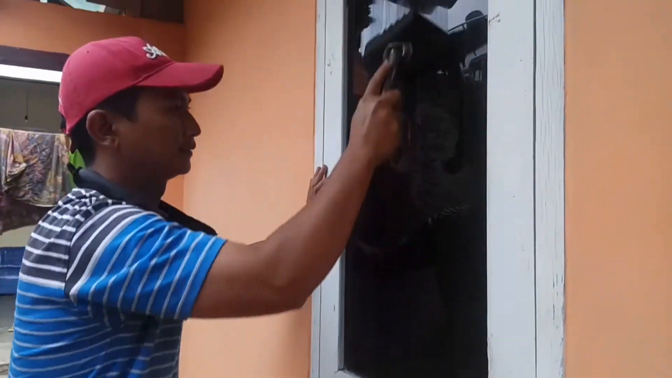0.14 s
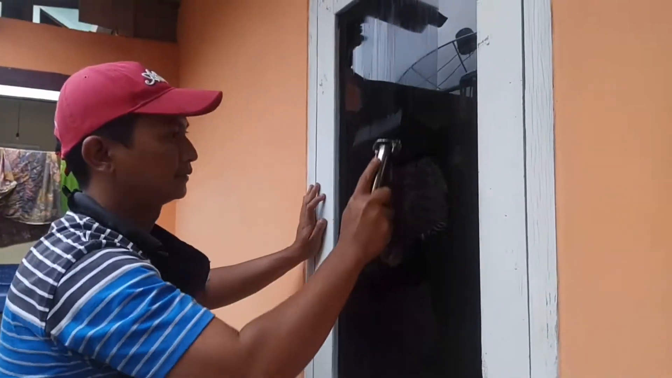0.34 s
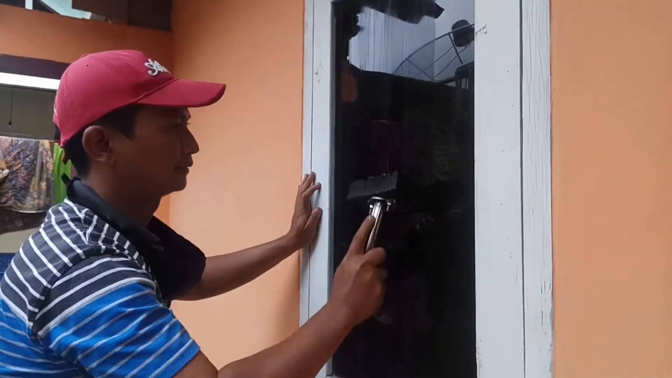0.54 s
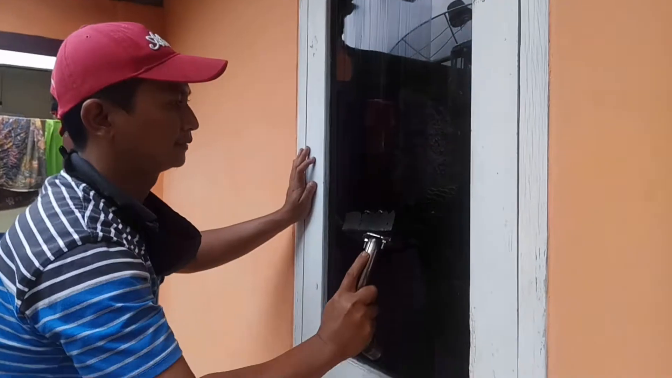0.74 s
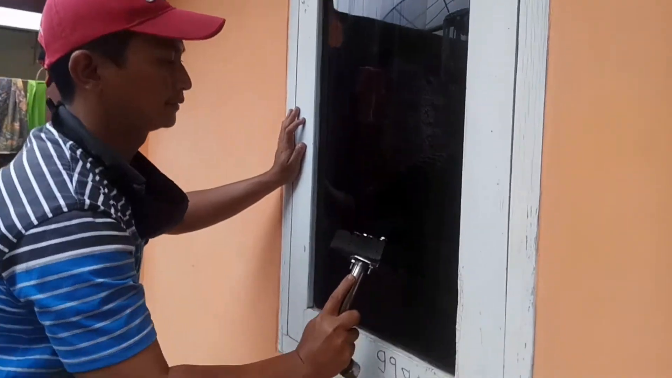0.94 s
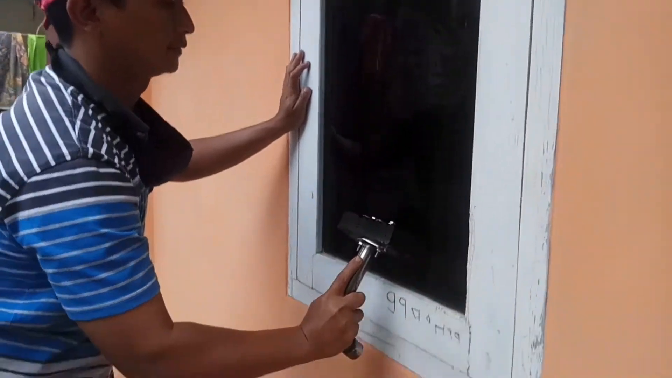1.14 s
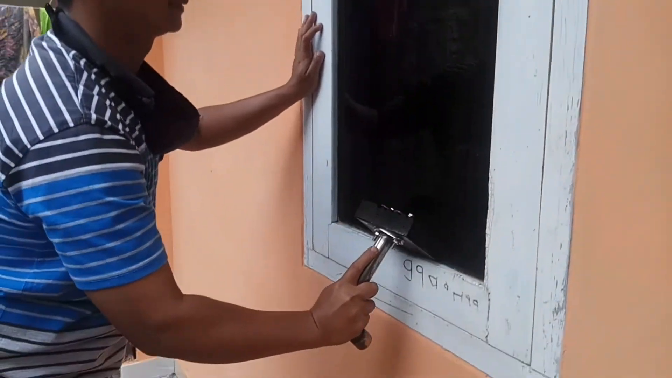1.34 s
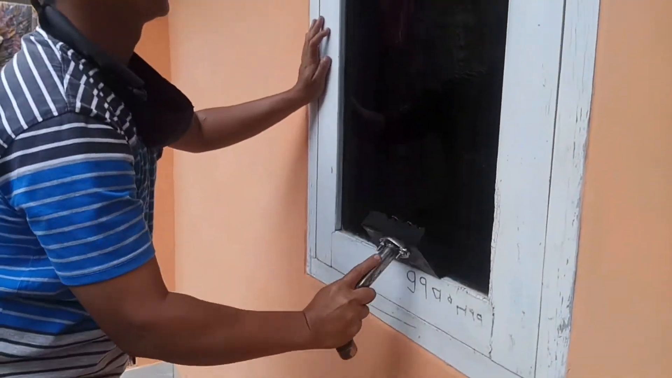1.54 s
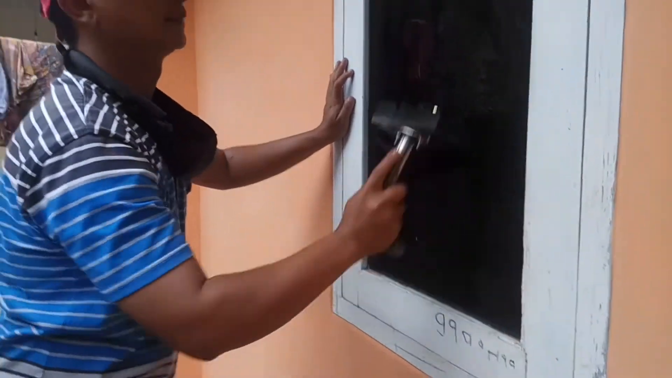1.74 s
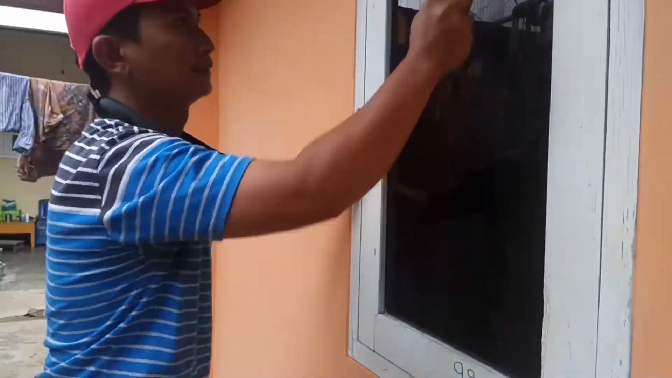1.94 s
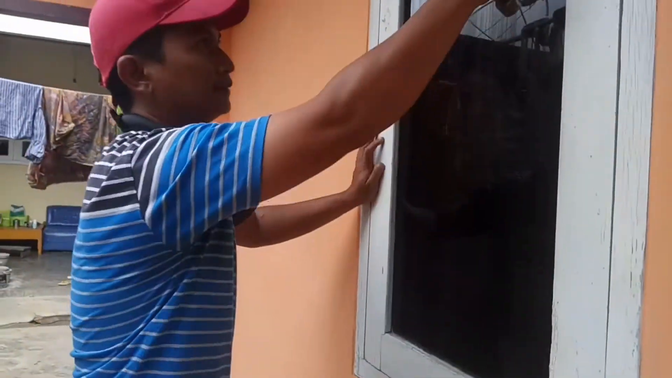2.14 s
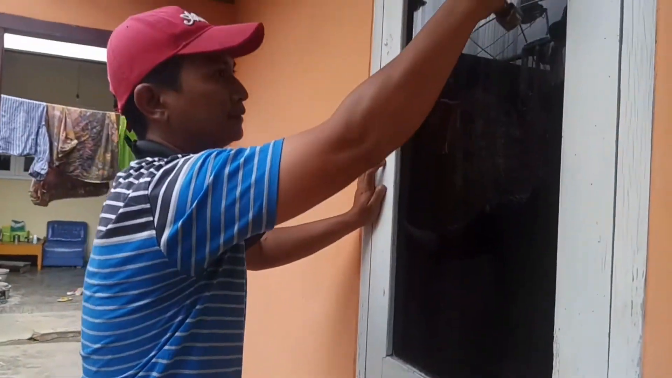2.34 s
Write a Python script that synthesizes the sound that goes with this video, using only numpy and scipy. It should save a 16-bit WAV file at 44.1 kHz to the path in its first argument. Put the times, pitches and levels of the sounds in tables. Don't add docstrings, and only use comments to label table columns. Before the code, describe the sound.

A rubber wiper grips a window pane with soft knocks and squeals one steady mid-pitched note for about a second, then thuds on the frame, lifts, and taps down again; close microphone, faint street rumble behind.

```python
import sys
import numpy as np
from scipy import signal
from scipy.io import wavfile
from scipy.ndimage import uniform_filter1d

SR = 44100
rng = np.random.default_rng(int(sys.argv[2]) if len(sys.argv) > 2 else 0)


def gain_from_db(level_db):
    decades = np.asarray(level_db, float) / 20
    return 10 ** decades


def wav_record(signal):
    frames = np.transpose(np.atleast_2d(signal))
    bounded = np.clip(frames, -1, 1)
    quanta = np.round(bounded * 32767).astype(np.int16)
    wavfile.write(sys.argv[1], SR, quanta)


N = 105840

# f/Hz, level/dB per Hz
RUMBLE_SPECTRUM = [(15, -51), (25, -34), (94, -4), (204, -23), (306, -24.5), (600, -41.5), (1310, -66),
                   (5030, -68), (6240, -65.5), (15600, -77.5)]
# f/Hz, likeness/0..1
STREET_LIKENESS = [(60, 1), (240, 0.79), (950, 0.97), (3770, 0.04), (15000, 0.03)]
# f/Hz, width/Hz, level/dB, left-right/dB
INSECT_BANDS = [
    (6400, 1100, -69, -16),
    (10800, 900, -84, -14),
    (13500, 120, -86, -12),
]
# t/s, level/dB, f/Hz, length/s, rattle/dB
BUMPS = [
    (0.0, -32, 104.7, 0.035, -21.5),
    (.165, -33, 95, .04, -24.5),
    (0.211, -34.5, 108.5, 0.04, -28.5),
    (0.417, -54, 200.3, .1, 2),
    (0.599, -56.5, 197.2, 0.095, 2),
    (1.415, -30, 78.4, 0.064, -18.5),
    (1.48, -33, 131, 0.08, -9.5),
    (1.559, -33.5, 132.7, 0.057, -16),
    (1.622, -39.5, 95.3, 0.051, -25),
    (2.19, -35.5, 140, 0.02, -17),
]
# t/s, length/s, f/Hz, width/Hz, level/dB
MURMURS = [
    (0.0, 0.047, 769, 23, -46),
    (0.043, 0.073, 771, 27, -49.5),
    (0.103, 0.11, 773, 42, -48),
    (0.0, 0.12, 332, 240, -44.5),
    (1.334, 0.078, 764, 24.8, -44),
    (2.21, 0.098, 1410, 277.8, -54.5),
]
# t/s, pressure level/dB, dullness/dB
RUB_STROKE = [(0, -50, -3.5), (.21, -49, -8), (.33, -53.5, 0), (.55, -56, 3.5), (.82, -55.5, -4),
              (.92, -48, -7.5), (1.14, -55.5, -5), (1.29, -49, 4.5), (1.44, -68.5, 16.5), (1.51, -52, 3),
              (1.59, -70, 13), (1.8, -75.5, 1), (2.02, -80, 18.5), (2.075, -53, -17), (2.13, -68.5, 3.5),
              (2.2, -49, -18.5), (2.35, -61.5, 3.5), (2.4, -55.5, -13)]
# f/Hz, level/dB per Hz
HISS_LEFT = [(250, -11.5), (1000, -13), (3000, -16), (5600, -12.5), (8000, -23), (10300, -16.5),
             (13600, -26), (15200, -15.5)]
# f/Hz, level/dB per Hz
HISS_RIGHT = [(250, -7.5), (1000, -12), (3000, -17), (5600, -8.5), (7200, -17.5), (8400, -37.5),
              (13800, -46.5), (15200, -24.5)]
# t/s, slip rate f/Hz, tone/dB, octave/dB, third partial/dB, left-right/dB
SQUEAK_PARTS = [
    [(.16, 750.5, -53, -89.5, -74.5, 3.5), (.202, 768, -21.5, -39, -68, -1),
     (.226, 762, -13, -37.5, -59.5, 1), (.285, 762.4, -13.5, -39, -58.5, 0),
     (.33, 761.4, -10, -36.5, -52, 0.5), (.39, 766, -15, -41, -61, 0), (.43, 762, -11.5, -35, -55, 1),
     (.48, 757, -9.5, -31, -49.5, -1), (.55, 754, -11, -31.5, -33.5, -5)],
    [(.6, 753, -14, -36.5, -39.5, -6), (.64, 751.6, -13, -29.5, -44, -5.5),
     (.68, 754.8, -9.5, -30.5, -41.5, 1), (.75, 756, -8, -34.5, -36.5, 0.5),
     (.81, 761, -11.5, -48, -41.5, 1.5), (.85, 760.5, -12, -44.5, -33, 0),
     (.92, 767, -24, -34.5, -37.5, -6.5), (.955, 762.3, -15, -37, -27, -1.5),
     (1.0, 764.6, -12, -40, -37, -1)],
    [(1.04, 765, -12.5, -37.5, -46.5, -3.5), (1.09, 765.5, -14, -37, -50, -5),
     (1.12, 764, -12.5, -41.5, -43.5, -4), (1.18, 759, -18, -49, -55, -5.5),
     (1.215, 762, -17, -42.5, -57, -3.5), (1.25, 766, -19, -42.5, -56.5, -6),
     (1.285, 770, -19.5, -54, -57.5, -6.5), (1.31, 777.4, -30, -62, -55, 9.5),
     (1.345, 761, -53, -64, -53, 10)],
]
# t/s, octave left-right/dB, third left-right/dB
NODE_LEAN = [(.2, 6.5, 11), (.24, 10.5, 7), (.37, 1, 0), (.45, 4.5, 9.5), (.57, -4.5, 0.5), (.61, -7.5, -9),
             (.68, 2.5, 0), (.74, 10, -2.5), (.8, -4, -7), (.84, -2.5, 7.5), (.89, -15, 7.5),
             (.95, -8.5, -1.5), (1.02, 4.5, -1), (1.15, -10, 6), (1.25, -4.5, -2)]
# middle t/s, length/s, level/dB
BITES = [
    [(.24, .05, -52.5), (.55, 0.17, -41.5), (.62, .08, -46.5), (.7, 0.1, -45), (.745, 0.067, -48),
     (.84, 0.11, -41), (.9, 0.076, -46.5), (.96, 0.16, -45)],
    [(.47, 0.13, -48), (.55, 0.08, -39.5), (.62, 0.052, -44.5), (.69, 0.079, -47.5), (.77, 0.13, -38.5),
     (.855, 0.045, -40.5), (.905, 0.11, -35), (.98, 0.09, -41), (1.07, 0.12, -45.5)],
    [(.5, 0.11, -52), (.58, 0.12, -44.5), (.65, 0.062, -49.5), (.73, .12, -40), (.79, .07, -43.5),
     (.85, 0.063, -35.5), (.95, 0.12, -38.5), (1.03, 0.069, -45.5)],
    [(.49, 0.11, -45.5), (.56, .09, -40), (.68, 0.19, -40.5), (.74, .07, -41.5), (.84, .09, -41),
     (.93, 0.11, -43), (1.02, 0.048, -44.5)],
    [(.56, 0.16, -48.5), (.62, 0.049, -43), (.68, 0.039, -41.5), (.75, 0.15, -44), (.835, 0.079, -46.5),
     (.9, 0.048, -46.5), (.96, 0.074, -44.5)],
]
TOP_PARTIALS_DB = [-13.5, -18.5]
# t/s, level/dB, f/Hz, width/Hz
TOUCHES = [
    (2.053, -50, 10400, 1800),
    (2.103, -44, 900, 800),
    (2.258, -48, 2600, 3000),
    (1.99, -62, 11040, 3000),
    (2.39, -48, 900, 900),
]
# t/s, level/dB, f/Hz, length/s
PUFFS = [(2.1405, -21, 280, 0.0094), (2.145, -34, 384, 0.01), (2.154, -11, 126, .024),
         (2.1605, -19.5, 257, 0.0092), (2.3, -24.5, 101, 0.021), (2.327, -23, 112, 0.018)]
# t/s, level/dB
GAIN_NOTCHES = [(.444, -.25), (.464, -.6), (.484, -.7), (.664, -.4), (.684, -.3), (.704, -.4), (.724, -.5)]


def evened(x):
    return x / np.sqrt(np.mean(x ** 2) + 1e-20)


def read(points, hz):
    f, value = np.transpose(points)
    return np.interp(np.log(hz + 1), np.log(f + 1), value)


def curve(rows, t):
    rows = np.array(rows, float)
    return [np.interp(t, rows[:, 0], col) for col in rows.T[1:]]


def add(mix, s, sound):
    part = mix[..., round(s * SR):][..., :sound.shape[-1]]
    part += sound[..., :part.shape[-1]]


def slow(hz, count):
    f = np.fft.fftfreq(N // 20 + 2, 20 / SR)
    z = rng.standard_normal((count, len(f))) + 1j * rng.standard_normal((count, len(f)))
    z = np.fft.ifft(z / (1 + (f / hz) ** 2))
    at = np.arange(N) / 20
    z = np.array([np.interp(at, np.arange(len(f)), row) for row in z])
    return z / np.sqrt(np.mean(abs(z) ** 2, 1))[:, None]


def resonate(x, hz, width):
    turn = np.exp(2j * np.pi * hz * np.arange(x.shape[-1]) / SR)
    r = np.exp(-np.pi * width / SR)
    return 2 * (turn * signal.lfilter([1 - r], [1, -r], x / turn)).real


def resonate_twice(x, hz, width):
    return evened(resonate(resonate(x, hz, width), hz, width))


def noise(field_db, same, patchy_db, flicker_db, size):
    frames, hz = 4 * N // size + 5, np.fft.rfftfreq(size, 1 / SR)
    a, b, c, d, patches = rng.standard_normal((frames, len(hz), 5)).T
    patches = uniform_filter1d(patches, size // 60, 0)
    patches = evened(uniform_filter1d(patches, 8192 // size, 1))
    flicker = evened(uniform_filter1d(rng.standard_normal(frames), size=4))
    same = np.clip(same * np.ones(len(hz)), -1, 1)[:, None]
    left = a + 1j * b
    right = same * left + np.sqrt(1 - same ** 2) * (c + 1j * d)
    level_db = field_db(hz, np.arange(frames) * size / 4 / SR)
    z = np.array([left, right]) * gain_from_db(level_db + patchy_db * patches + flicker_db * flicker)
    return signal.istft(z, nperseg=size, noverlap=3 * size // 4)[1][:, :N]


def rumble():
    def field_db(hz, t):
        return read(RUMBLE_SPECTRUM, hz)[:, None]
    same = read(STREET_LIKENESS, np.fft.rfftfreq(2048, 1 / SR))
    return gain_from_db(-39) * evened(noise(field_db, same, patchy_db=1.0, flicker_db=0.5, size=2048))


def insects():
    hush_s, hush_db = 1.86, -3
    out = np.zeros((2, N))
    for hz, width, db, pan_db in INSECT_BANDS:
        band = resonate_twice(rng.standard_normal((2, N)), hz, width)
        chirr_db = 3 * slow(13, count=1).real
        out += band * gain_from_db(db + pan_db * np.array([[.5], [-.5]]) + chirr_db)
    return out * gain_from_db(hush_db * np.clip((np.arange(N) / SR - hush_s) / 0.047, 0, 1))


def bumps():
    rattle_hz = 225
    out = np.zeros(N)
    for s, db, hz, length, rattle_db in BUMPS:
        t = np.arange(0, 4 * length, 1 / SR)
        push = rng.standard_normal(len(t)) * (t / length) ** 2 * np.exp(-4 * t / length)
        low = np.sin(2 * np.pi * hz * t) * np.sin(np.pi * np.minimum(t / length, 1)) ** 2
        rattle = resonate(resonate(push, rattle_hz, rattle_hz), hz, 2 * rattle_hz)
        add(out, s, gain_from_db(db) * (np.sqrt(2) * low + gain_from_db(rattle_db) * evened(rattle)))
    return out


def porch(x):
    t60_s, density = 0.062, .05
    t = np.arange(SR // 3) / SR
    signs = rng.choice([-1., 1.], (2, len(t)))
    taps = signs * (rng.random((2, len(t))) < density) * gain_from_db(-60 * t / t60_s)
    return signal.fftconvolve(x, taps / np.linalg.norm(taps[0]), axes=1)[:, :N]


def murmurs():
    out = np.zeros((2, N))
    for s, length, hz, width, db in MURMURS:
        u = np.arange(0, 1, 1 / SR / length)
        z = rng.standard_normal((3, len(u)))
        hum = resonate_twice(z[0] + 0.91 * z[1:], hz, width)
        hum = evened(hum + 60 / width * np.sin(2 * np.pi * hz * length * u))
        add(out, s, gain_from_db(db) * hum * np.sin(np.pi * u) ** 0.48)
    return out


def rub():
    dull_hz = 2060
    hollow_hz, hollow_width_hz, hollow_db = 2840, 450, -10

    def field_db(hz, t):
        level_db, dull_db = curve(RUB_STROKE, t)
        shape = np.array([read(HISS_LEFT, hz), read(HISS_RIGHT, hz)])[:, :, None]
        hz = hz[:, None]
        locked = np.clip((t - .2) / .3, 0, 1) * np.clip((1.22 - t) / .06, 0, 1)
        hollow = hollow_db * locked * np.exp(-((hz - hollow_hz) / hollow_width_hz) ** 2)
        return shape + hollow + level_db + dull_db / (1 + (hz / dull_hz) ** 2)
    return gain_from_db(4) * noise(field_db, same=0.15, patchy_db=1.2, flicker_db=.8, size=512)


def squeak():
    wobble_hz, shimmer, skirt_db, skirt_hz = 1.8, 0.054, -37, 89
    fade_hz, fade_depth, tone_lag_rad = 24, .36, .17
    t, ports = np.arange(N) / SR, np.array([[1], [-1]])
    rows = sum(SQUEAK_PARTS, [])
    hz, tone_db, octave_db, third_db, pan_db = curve(rows, t)
    octave_pan_db, third_pan_db = curve(NODE_LEAN, t)
    gate = np.clip((t - rows[0][0]) / 0.011, 0, 1) * np.clip((rows[-1][0] - t) / 0.01, 0, 1)
    turn = 2 * np.pi * np.cumsum(hz + wobble_hz * slow(25, count=1)[0].real) / SR

    def overtone(k, level, fade, lag_rad, wander_rad, wander_hz):
        lag = (lag_rad + wander_rad * slow(wander_hz, count=1).real) * ports
        return level * (1 + fade * slow(fade_hz, count=2)) * np.exp(1j * lag + 1j * k * turn)

    lag = tone_lag_rad * (1 + .5 * slow(2.4, count=1).real) * ports
    side = gain_from_db(pan_db * ports / 2) * np.exp(1j * lag)
    rough = 1 + shimmer * slow(34, count=1) + gain_from_db(skirt_db) * slow(skirt_hz, count=2)
    out = side * gain_from_db(tone_db) * rough * np.exp(1j * turn)
    out += overtone(2, gain_from_db(octave_db + octave_pan_db * ports / 2), fade_depth / 2, .32, .25, 4)
    out += overtone(3, gain_from_db(third_db + third_pan_db * ports / 2), fade_depth / 2, .42, .3, 5)

    swells = []
    for zones in BITES:
        power = sum(gain_from_db(2 * db) * np.exp(-(4 * (t - s) / length) ** 2) for s, length, db in zones)
        swells.append(np.sqrt(power))
    swells += [gain_from_db(db) * swells[-1] for db in TOP_PARTIALS_DB]
    for k, swell in enumerate(swells, 4):
        out += overtone(k, 0.99 * swell, fade_depth, .62, .35, 8)
    return np.sqrt(2) * gate * out.real, tone_db


def touches():
    decay_s, land_s = .012, .004
    out, t = np.zeros((2, N)), np.arange(4000) / SR
    for s, db, hz, width in TOUCHES:
        tick = resonate_twice(rng.standard_normal((2, len(t))), hz, width)
        tick = tick * np.exp(-t / decay_s) * np.minimum(t / land_s, 1)
        add(out, s, gain_from_db(db - np.array([[0], [12]]) * hz / 10000) * tick)
    return out


def wind():
    out = np.zeros((2, N))
    for s, db, hz, length in PUFFS:
        u = np.arange(0, 1, 1 / SR / length)
        swing = np.cos(2 * np.pi * hz * length * (u - .47) * (1.2 - .5 * u))
        add(out[1], s, -gain_from_db(db) * swing * np.sin(np.pi * u) ** 2)
    return out


def scene():
    tone, tone_db = squeak()
    knock = bumps()
    duck = gain_from_db(-0.1 * uniform_filter1d(np.maximum(tone_db + 32, 0), size=4000))
    glass = tone + murmurs() + rub() + touches() + knock + gain_from_db(-6.5) * porch(knock[None])
    return glass + duck * rumble() + insects() + wind()


def band_limit(x):
    return signal.sosfilt(signal.butter(12, 16810, fs=SR, output="sos"), x)


def record(dry):
    notch_s, notch_edge_s = .014, .0006
    t = np.arange(N) / SR
    gain_db = np.zeros(N)
    for s, db in GAIN_NOTCHES:
        gain_db += db * np.clip((t - s) / notch_edge_s, 0, 1) * np.exp(-abs(t - s) / notch_s)
    dry = dry * gain_from_db(gain_db)
    dry = dry - 0.51 * resonate(dry, hz=7820, width=260)
    edge = signal.firwin(511, 15640, window=("kaiser", 9), fs=SR)
    return band_limit(signal.oaconvolve(dry, edge[None], "same"))


dry = scene()
out = record(dry)
wav_record(out)
```